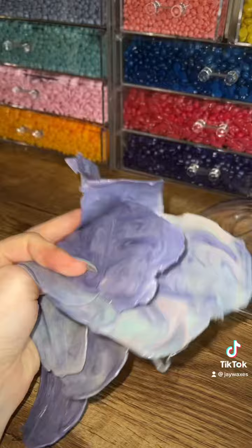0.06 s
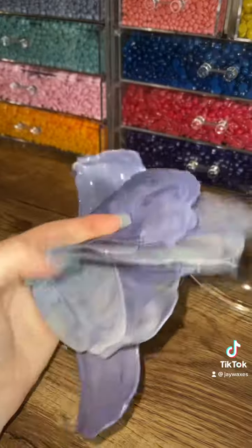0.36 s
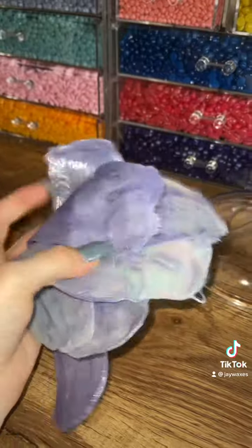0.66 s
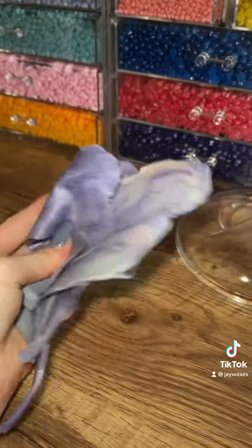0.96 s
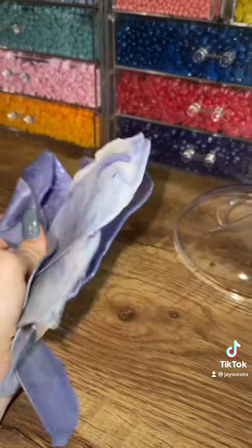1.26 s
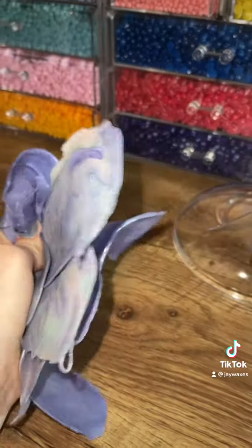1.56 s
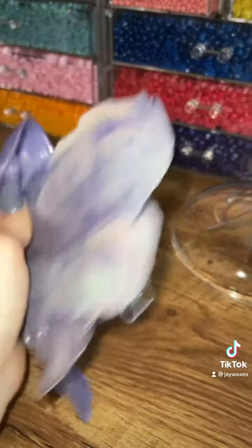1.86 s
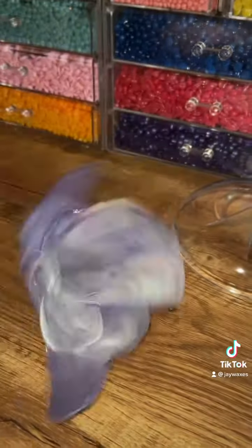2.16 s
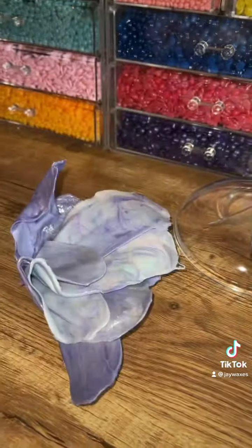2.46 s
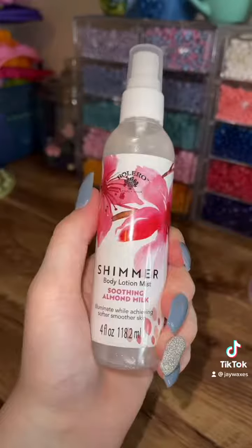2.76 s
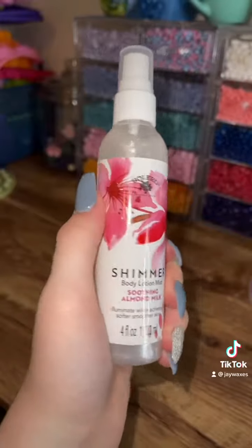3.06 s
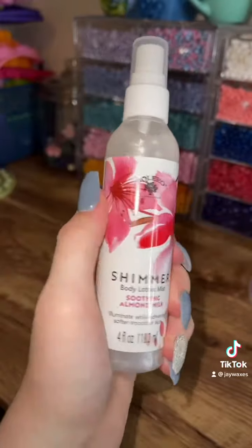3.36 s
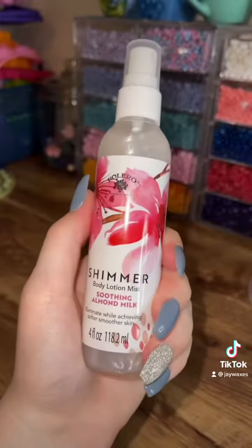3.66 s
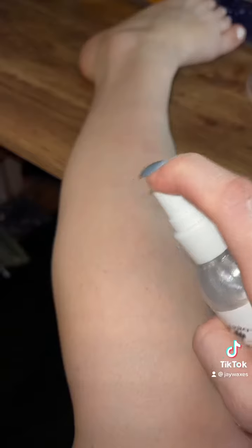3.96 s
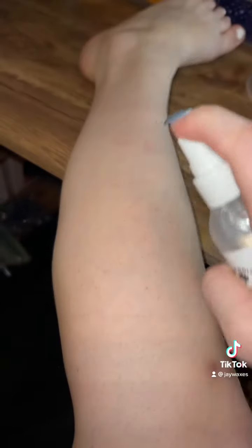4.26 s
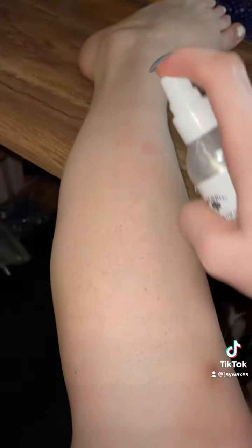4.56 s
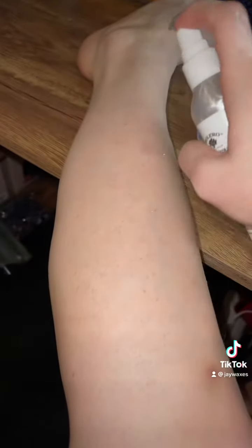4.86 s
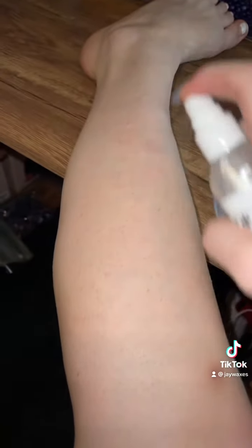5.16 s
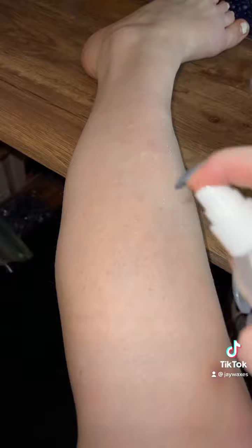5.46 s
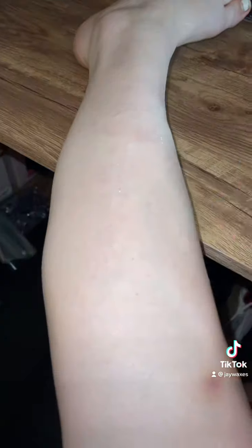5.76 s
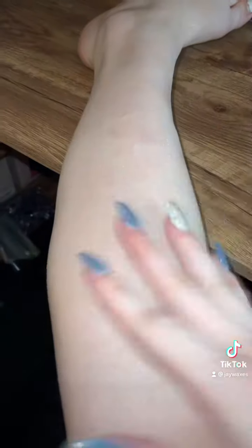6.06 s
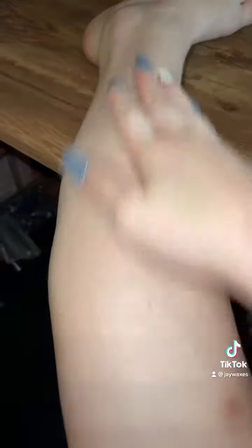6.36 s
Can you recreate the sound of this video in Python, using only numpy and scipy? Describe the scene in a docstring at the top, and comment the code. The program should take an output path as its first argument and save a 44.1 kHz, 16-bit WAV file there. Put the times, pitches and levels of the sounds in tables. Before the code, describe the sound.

From the start, hardened wax strips crackle and rustle in irregular bursts as a hand flexes them close to the microphone, with the sharpest snaps around 1.8 seconds. At about 2.1 seconds they slap down on a wooden table, which gives a low thump, the loudest sound. A brief silence at 2.6 seconds is followed by faint, dull handling bumps. From about 4 to 5.7 seconds a small mist bottle is pumped seven times, evenly and quickly, growing louder toward the end. Each stroke is a click and a short hiss, with a tiny gurgle and usually a light knock as the pump returns. After another very short silence, a palm makes one soft, brushing stroke over wet skin from about 6.1 to 6.6 seconds. A faint fan hums in the small room behind these sounds.

```python
"""Wax strips and a mist bottle

Hardened wax strips crackle as a hand flexes them, then drop on a wooden table, which booms.
A mist bottle is lifted and pumped seven times at a leg: valve snap, nozzle hiss, gurgle, piston knock.
A palm rubs the lotion in. Small room, humming fan, close microphone; two brief gaps of silence."""
import sys
import numpy as np
from scipy import signal
from scipy.fft import rfft, irfft
from scipy.io import wavfile
from scipy.ndimage import uniform_filter1d

SR = 44100
rng = np.random.default_rng(int(sys.argv[2]) if len(sys.argv) > 2 else 0)


def to_wav(s):
    """Save 16-bit WAV."""
    ch = np.atleast_2d(s).T  # columns
    pcm = np.round(np.clip(ch, -1, 1) * 32767)  # PCM
    wavfile.write(sys.argv[1], SR, pcm.astype(np.int16))


N = 291060
TIME = np.arange(N) / SR

# Audible spans. Each row: start and end in seconds, first and last fan gain in dB,
# last hiss level in dB, extra gain of the hushed opening in dB.
SPANS = [(0, 2.606, -4, -1, -93, -5), (2.78, 3.873, -12, -9, -81, -9.5), (3.84, 5.75, -10, 1, -99.5, -6.5),
         (5.87, 6.692, -1, 1, -77, 0)]
# Pump strokes. Each row: snap time in seconds, relative snap level in dB, snap pitch factor,
# mist start and length in seconds, mist level in dB.
STROKES = [(3.9683, -36.5, 0.97, 3.963, 0.092, -53.5), (4.2436, -38.5, 1.12, 4.288, 0.081, -49.5),
           (4.5297, -36.5, 1.07, 4.571, 0.089, -49), (4.814, -35.5, 0.97, 4.848, 0.098, -49.5),
           (5.0817, -34, 1.01, 5.124, 0.074, -45.5), (5.3407, -31.5, 0.94, 5.384, 0.059, -42),
           (5.5969, -27, 1.02, 5.624, 0.054, -43.5)]


def amp(db):
    """Decibels to gain."""
    return 10 ** (np.asarray(db) / 20)


def unit(x):
    """Scale to rms 1."""
    return x / np.sqrt(np.mean(x ** 2) + 1e-20)


def read(points, hz):
    """Interpolate (Hz, value) points on a log-frequency axis."""
    points_hz, values = np.transpose(points)
    return np.interp(np.log(hz + 1), np.log(points_hz + 1), values)


def add(mix, start_s, sound):
    """Mix a sound in, in place."""
    part = mix[max(round(start_s * SR), 0):][:len(sound)]
    part += sound[:len(part)]


def colour(x, spectrum):
    """Filter by (Hz, dB) points; rms 1."""
    gain = amp(read(spectrum, np.fft.rfftfreq(len(x), 1 / SR)))
    return unit(irfft(rfft(x) * gain, len(x)))


def drift(per_s):
    """Slow random wander; rms 1."""
    knots_s = np.arange(0, 7, 1 / per_s)
    return unit(np.interp(TIME, knots_s, rng.standard_normal(len(knots_s))))


def ring(hz, t60_s):
    """One decaying mode."""
    t = np.arange(SR // 2) / SR
    return 1000. ** (-t / t60_s) * np.sin(2 * np.pi * hz * t)


def click(shape_db, decay_s, chatter, size=4096):
    """A sharp release and a dying chatter of smaller slips; energy of 1 ms at rms 1."""
    t = np.arange(size) / SR
    after_slips = rng.standard_normal(size) * np.exp(-t / decay_s)
    drive = (t == 0) + chatter * after_slips / np.linalg.norm(after_slips)
    log_gain = np.log(amp(shape_db(abs(np.fft.fftfreq(size, 1 / SR)))))
    minimum_phase = np.exp(np.conj(signal.hilbert(log_gain)))
    sound = np.fft.ifft(np.fft.fft(drive) * minimum_phase).real
    return sound / np.linalg.norm(sound) * np.sqrt(SR / 1000)


def grains(per_s, spread_db):
    """Random train of tiny impulses, a few much larger than the rest."""
    sizes = amp(spread_db * np.minimum(rng.exponential(1, N), 3.5))
    return unit(sizes * rng.choice([-1, 1], N) * (rng.random(N) < per_s / SR))


def room(x, early_boost=0.93, early_s=0.024):
    """Close reflections off table and shelves run into a short tail that dies sooner in the treble."""
    # Room decay. Each row: frequency in Hz, t60 in seconds.
    decay = [(150, 0.55), (1000, 0.36), (4000, 0.34), (14000, 0.14)]
    t = np.arange(SR // 2) / SR
    echoes = rng.standard_normal(len(t)) * (rng.random(len(t)) < .15) * (t > .002)
    echoes *= 1 + early_boost * np.exp(-t / early_s)
    hz, frame_s, frames = signal.stft(echoes, SR, nperseg=256)
    fade = 1000. ** (-frame_s / read(decay, hz)[:, None])
    tail = signal.istft(frames * fade, SR, nperseg=256)[1]
    return signal.fftconvolve(x, tail / np.linalg.norm(tail))[:N]


def fan(rush_db=-59, waver_db=2.5, waver_turns=0.082):
    """A low rush of air and a wavering hum."""
    # Hum tones. Each row: frequency in Hz, relative level in dB.
    tones = [(58.5, -57), (168, -71), (274, -71), (312, -77.5)]
    # Air rush spectrum. Each row: frequency in Hz, relative density in dB.
    rush_spectrum = [(25, -0.5), (55, 3.5), (100, -1.5), (200, -4.5), (330, -6.5), (600, -11.5),
                     (1000, -20.5), (2500, -24), (5000, -32.5), (10000, -32), (12000, -38), (16000, -39)]
    hum = np.zeros(N)
    for hz, db in tones:
        peak = np.sqrt(2) * amp(db + waver_db * drift(8))
        hum += peak * np.sin(2 * np.pi * (hz * TIME + waver_turns * drift(6)))
    return hum + amp(rush_db) * colour(rng.standard_normal(N), rush_spectrum)


def background(opening_s=.14, fade_s=.012):
    """The fan under a thin high hiss; each span opens hushed and slowly grows louder."""
    # Hiss spectrum. Each row: frequency in Hz, relative density in dB.
    hiss_spectrum = [(3000, -13), (9000, -16), (12000, -11.5), (13500, 4.5), (15500, 2.5), (16000, -2.5)]
    fan_sound = fan()
    hiss = colour(rng.standard_normal(N), hiss_spectrum)
    out = np.zeros(N)
    for start_s, end_s, first_db, last_db, hiss_db, opening_db in SPANS:
        span = (TIME >= start_s) & (TIME < end_s)
        t = TIME[span] - start_s
        hushed = .5 - .5 * np.tanh((t - opening_s) / fade_s)
        swell = amp((first_db - last_db) * (1 - t / (end_s - start_s)) + opening_db * hushed)
        out[span] = swell * (amp(last_db) * fan_sound[span] + amp(hiss_db) * hiss[span])
    return out


def handling():
    """Dull swells as the fingers shift their grip."""
    # Soft hand bumps. Each row: start and length in seconds, level in dB, upper edge in Hz.
    bumps = [(0.16, 0.083, -52, 150), (0.84, .13, -57, 149), (1.143, .1, -55, 796), (1.25, .11, -54.5, 130),
             (2.923, 0.12, -55, 75.4), (2.931, 0.1, -65, 345.5), (3.017, .07, -58.5, 499),
             (3.066, .09, -61.5, 170), (3.421, 0.078, -65, 300), (3.49, 0.084, -58, 64.8)]
    out = np.zeros(N)
    for start_s, length_s, db, edge_hz in bumps:
        lowpass = signal.butter(2, edge_hz, fs=SR, output="sos")
        dull = signal.sosfilt(lowpass, rng.standard_normal(SR))[-int(length_s * SR):]
        add(out, start_s, amp(db) * unit(dull) * signal.windows.tukey(len(dull), .7))
    return out


def palm(uneven_db=1.5, stubble=0.44, touch_s=6.063, touch_db=-63):
    """A fingertip touches down, then one smooth stroke runs up the wet shin."""
    # Rub envelope. Each row: time in seconds, level in dB.
    rub = [(6.04, -85), (6.09, -66.5), (6.14, -57), (6.22, -57.5), (6.35, -56.5), (6.46, -59.5),
           (6.54, -66), (6.6, -80)]
    # Skin friction spectrum. Each row: frequency in Hz, relative density in dB.
    skin = [(400, -19), (700, -12), (900, -25), (1500, -9), (2200, -8.5), (2800, -0.5), (3600, -6.5),
            (5300, -8.5), (7700, -10.5), (8800, -7), (11300, -13.5), (15000, -9)]
    rub_s, rub_db = np.transpose(rub)
    envelope = np.interp(TIME, rub_s, amp(rub_db), left=0, right=0)
    friction = rng.standard_normal(N) + stubble * grains(per_s=2200, spread_db=4)
    out = envelope * amp(uneven_db * drift(40)) * colour(friction, skin)
    add(out, touch_s, amp(touch_db) * click(lambda hz: read(skin, hz), decay_s=.002, chatter=2))
    return out


def gulps(gain_db=-3, delay_s=.034, neck_hz=2010, width_octaves=.16, skirt_db=-17):
    """Air drawn back through the pump gurgles in the bottle's neck, louder after a stronger puff."""
    def shape_db(hz):
        octaves = np.log2((hz + 1) / neck_hz)
        return skirt_db * (1 - np.exp(-(octaves / width_octaves) ** 2)) - 8 * abs(octaves)
    out = np.zeros(N)
    for *_, start_s, length_s, db in STROKES:
        gurgle = click(shape_db, decay_s=.007, chatter=2.2)
        add(out, start_s + length_s + delay_s, amp(db + gain_db) * gurgle)
    return out


def pump(press_db=-5, return_db=-5, lag_s=.0008,
         bottle_db=-20, press_hz=1930, return_hz=2330, bottle_t60_s=.11):
    """The valve snaps going down, the piston knocks coming up; the bottle rings faintly after both."""
    # Piston springing back. Each row: time in seconds, relative level in dB, pitch factor.
    returns = [(4.153, -39.5, 1), (4.460, -41, 0.98), (4.746, -39.5, 0.69), (4.753, -39, 0.96),
               (5.032, -53.5, 0.76), (5.556, -36.5, 0.96), (5.731, -43, .95)]
    # Valve and piston spectra at pitch factor 1. Each row: frequency in Hz, gain in dB.
    valve = [(200, -15), (550, -3), (900, -13), (1400, -10.5), (1850, -1.5), (2200, -5.5), (3000, -2.5),
             (4300, -14), (7500, -14.5), (12000, -24.5), (15500, -21)]
    piston = [(300, -29), (800, -18.5), (1600, -7), (2050, -10), (2420, -1), (2800, -6), (3250, -0.5),
              (3900, -14.5), (5000, -30), (15000, -53.5)]
    out = np.zeros(N)
    for start_s, db, pitch, *_ in STROKES:
        snap = click(lambda hz: read(valve, hz / pitch), decay_s=.0028, chatter=2.8)
        bottle = amp(bottle_db) * ring(press_hz * pitch, bottle_t60_s)
        add(out, start_s + lag_s, amp(db + press_db) * snap)
        add(out, start_s + lag_s, amp(db + press_db) * bottle)
    for start_s, db, pitch in returns:
        knock = click(lambda hz: read(piston, hz / pitch), decay_s=.0016, chatter=1)
        bottle = amp(bottle_db) * ring(return_hz * np.sqrt(pitch), bottle_t60_s)
        add(out, start_s + lag_s, amp(db + return_db) * knock)
        add(out, start_s + lag_s, amp(db) * bottle)
    return out


def mist(arch_db=6, rise_s=0.0043, fall_s=0.018, droplets=0.57):
    """The nozzle hisses while the pressure swells and sinks; droplets roughen the jet."""
    # Jet spectrum. Each row: frequency in Hz, relative density in dB.
    jet_spectrum = [(250, -19), (550, -8), (850, -10.5), (1300, -2.5), (1900, -0.5), (2750, 2),
                    (3900, -2.5), (6000, -6), (7300, -9.5), (9200, -4), (11300, -13), (14000, -6.5),
                    (16000, -8)]
    flow = np.zeros(N)
    for *_, start_s, length_s, db in STROKES:
        t = np.maximum(TIME - start_s, 0)
        pressure_db = arch_db * (np.sin(np.pi * np.minimum(t / length_s, 1)) - 1)
        gate = (1 - np.exp(-t / rise_s)) * np.exp(-np.maximum(t - length_s, 0) / fall_s)
        flow += amp(db + pressure_db) * gate
    jet = rng.standard_normal(N) + droplets * grains(per_s=2500, spread_db=2)
    return flow * colour(jet, jet_spectrum)


def table_top(contact_s=0.0094):
    """The soft weight of the wax settles over several milliseconds and booms the board."""
    # Board modes. Each row: frequency in Hz, relative level in dB, t60 in seconds.
    modes = [(79.3, -12, .25), (109.1, -0.5, .115), (122.4, -3, .13), (141, -13, .18), (170, -19, 0.27),
             (212, -17.5, .2), (272, -20.5, .17), (364.6, -21.5, .12), (460.5, -23.5, .09)]
    # Blows on the board. Each row: start in seconds, gain in dB.
    thumps = [(0.171, -44), (2.106, -29), (2.136, -31), (2.180, -9), (2.241, -27), (2.299, -31.5)]
    t = np.arange(SR // 2) / SR
    onset = 1 - np.exp(-(t / contact_s) ** 2)
    boom = onset * sum(amp(db) * ring(hz, t60_s) for hz, db, t60_s in modes)
    out = np.zeros(N)
    for start_s, db in thumps:
        add(out, start_s, amp(db) * boom)
    return out


def clatter(slap_db=-3, radiation_hz=950):
    """Strips slap flat on each other or on the wood, and ring hollow when knocked."""
    # Slaps. Each row: start in seconds, relative level in dB, decay in seconds.
    slaps = [(0.1712, -28.5, 0.0011), (2.089, -33.5, 0.0076), (2.102, -15.5, 0.01), (2.1325, -17, 0.0098),
             (2.175, -20.5, 0.0058), (2.290, -37.5, 0.0069)]
    # Slap spectrum. Each row: frequency in Hz, gain in dB.
    slap_spectrum = [(30, -19), (100, -0.5), (300, -0.5), (550, -4), (1100, -1), (1900, -0.5), (3000, -13),
                     (6000, -20.5), (15000, -31)]
    # Knocks. Each row: start in seconds, gain in dB, lowest mode in Hz, its t60 in seconds.
    knocks = [(1.8389, -29.5, 1614, .024), (1.840, -36, 1843, .18), (2.028, -42.5, 1090, .09),
              (2.3275, -47, 3600, 0.037)]
    # Bending modes of a strip. Each row: frequency ratio, relative level in dB.
    modes = [(1, -0.5), (1.09, -7.5), (1.48, -14.5), (1.9, -10), (2.7, -10)]
    out = np.zeros(N)
    for start_s, db, decay_s in slaps:
        slap = click(lambda hz: read(slap_spectrum, hz), decay_s, chatter=3.3)
        add(out, start_s, amp(db + slap_db) * slap)
    highpass = signal.butter(2, radiation_hz, "high", fs=SR, output="sos")  # too small to radiate bass
    for start_s, db, hz, t60_s in knocks:
        strip = sum(amp(db + mode_db) * ring(hz * ratio, t60_s / ratio) for ratio, mode_db in modes)
        add(out, start_s, signal.sosfilt(highpass, strip))
    return out


def flexing(lead_db=-14.5, lead_s=.014, attack_s=.0063, release_s=.025, settle_db=-11.5, settle_s=.088):
    """Surface and body envelopes of the wax: each flex leads in, builds, holds, lets go and settles."""
    # Flexes. Each row: start and hold in seconds, surface level in dB, body level relative to it in dB.
    flexes = [(0.0, 0.0086, -61, -4.5), (0.098, 0.022, -55.5, -14), (0.152, 0.059, -49.5, -5.5),
              (0.277, 0.019, -56, -7), (0.492, 0.024, -47.5, -4.5), (0.633, 0.019, -54.5, -7),
              (0.8, 0.19, -56, -3.5), (0.835, 0.04, -44.5, -9), (1.046, 0.078, -45, -11.5),
              (1.148, .06, -50, -8), (1.237, 0.13, -52.5, -8.5), (1.415, 0.11, -64.5, -7),
              (1.693, 0.044, -65.5, -8.5), (1.741, .04, -45, -8), (1.792, 0.079, -42, -3),
              (1.884, 0.099, -47.5, -1), (2.086, 0.098, -45, 2), (2.474, .04, -73, -10)]
    surface_power, body_power = np.zeros(N), np.zeros(N)
    for start_s, hold_s, db, body_db in flexes:
        before_s = np.maximum(start_s - TIME, 0)
        since_s = np.maximum(TIME - start_s, 0)
        after_s = np.maximum(since_s - hold_s, 0)
        attack = np.exp(-before_s / lead_s) * (1 - (1 - amp(lead_db)) * np.exp(-since_s / attack_s))
        settling = amp(settle_db) * np.exp(-after_s / settle_s)
        release = (np.exp(-after_s / release_s) + settling) / (1 + amp(settle_db))
        power = (amp(db) * attack * release) ** 2
        surface_power += power
        body_power += power * amp(body_db) ** 2
    return np.sqrt(surface_power), np.sqrt(body_power)


def slips(hiss=.45, clump_db=2.5):
    """Rough faces catch and slip in clumps of grains over a fine hiss."""
    friction = grains(per_s=650, spread_db=4.5) + hiss * rng.standard_normal(N)
    return friction * amp(clump_db * drift(180))


def rustle(flex, bend, fizz_db=-3, sparkle_db=-6, body_db=-3):
    """Strips slide over each other: one stream of slips gives fizz and body, another a brighter sparkle."""
    # Spectra of sliding wax. Each row: frequency in Hz, relative density in dB.
    fizz = [(1500, -24), (3300, -0.5), (5500, -0.5), (7500, -3.5), (9600, 0), (11500, -12), (16000, -18.5)]
    sparkle = [(3000, -24), (6000, -6.5), (9300, 1), (11500, -5.5), (14000, 1.5), (16000, -3)]
    body = [(200, -18), (700, -17), (1100, -3.5), (1900, 2), (2800, -6.5), (4500, -25), (9000, -37.5)]
    low_slips, high_slips = slips(), slips()
    surface = amp(fizz_db) * colour(low_slips, fizz) + amp(sparkle_db) * colour(high_slips, sparkle)
    return flex * surface + amp(body_db) * bend * colour(low_slips, body)


def small_cracks(flex, count=200, per_s=26, until_s=2.6, usual_db=-36.5, spread_db=1,
                 usual_flex_db=-47.5, db_per_flex_db=.83, flake_hz=6000, spread_octaves=.7):
    """Rows for fine chance cracks, louder the harder the wax is flexed."""
    start_s = (np.arange(count) + rng.random(count)) / per_s
    strength, pitch = np.clip(rng.standard_normal((count, 2)), -2, 2).T
    flex_db = 20 * np.log10(np.interp(start_s, TIME, flex) + 1e-9)
    db = usual_db + db_per_flex_db * (flex_db - usual_flex_db) + spread_db * strength
    ring_hz = flake_hz * 2 ** (spread_octaves * pitch)
    return [row for row in zip(start_s, db, ring_hz) if row[0] < until_s]


def cracks(flex, usual_hz=7000, ring_db=6, ring_db_per_octave=2, width_octaves=.27,
           body_hz=3100, body_db=-1.5, body_db_per_octave=4.5):
    """Each crack rings a wax flake; a larger, lower flake rings clearer and bends the strip more."""
    # Loudest cracks. Each row: start in seconds, level in dB, flake ring in Hz.
    loud_cracks = [(0.1071, -42, 9000), (0.156, -35.5, 8000), (0.163, -38.5, 2167), (0.1704, -21, 8250),
                   (0.3055, -41.5, 7800), (0.3649, -44.5, 1150), (0.4954, -36.5, 4350),
                   (0.5057, -31.5, 9430), (0.5244, -40, 1250), (0.642, -36, 1500), (0.6958, -42.5, 1940),
                   (0.7671, -46, 1980), (0.7937, -42.5, 7000), (0.8112, -39, 1890), (0.8323, -34, 3300),
                   (0.8825, -35, 5990), (0.943, -35.5, 6160), (1.0548, -34, 2330), (1.0913, -27, 4310),
                   (1.112, -28.5, 13000), (1.2069, -35, 5680), (1.288, -38.5, 9130), (1.3305, -34.5, 2710),
                   (1.4202, -37, 5340), (1.4683, -31.5, 3560), (1.5171, -35.5, 8800), (1.5737, -45.5, 5340),
                   (1.6528, -43, 3200), (1.6932, -47, 4480), (1.7991, -28.5, 3880), (1.8139, -29.5, 6730),
                   (1.8382, -20.5, 1750), (1.8483, -20, 7150), (1.8562, -24.5, 10470), (1.8906, -28, 3396),
                   (2.0838, -32.5, 7360), (2.1504, -23, 8530), (2.259, -41.5, 9400), (2.3275, -33.5, 3570),
                   (2.476, -43.5, 4850), (2.504, -44.5, 4160)]
    # Base crack spectrum. Each row: frequency in Hz, gain in dB.
    spectrum = [(200, -24.5), (700, -20), (1200, -9), (2000, -4), (4000, 0), (5500, -2.5), (9000, 1),
                (11500, -8), (14000, -6.5), (16000, -9)]
    out = np.zeros(N)
    for start_s, db, ring_hz in list(loud_cracks) + small_cracks(flex):
        def shape_db(hz):
            octaves_down = np.log2(usual_hz / ring_hz)
            resonance = np.exp(-(np.log2((hz + 1) / ring_hz) / width_octaves) ** 2)
            flake_db = (ring_db + ring_db_per_octave * octaves_down) * resonance
            strip_db = (body_db + body_db_per_octave * octaves_down) / (1 + (hz / body_hz) ** 4)
            return read(spectrum, hz) + flake_db + strip_db
        add(out, start_s, amp(db) * click(shape_db, decay_s=.00095, chatter=1.3))
    return out


def scene(wax_room_db=-10, slap_room_db=-13, pump_room_db=-8, lotion_room_db=-8):
    """All sources in mono, the bright ones with their share of the room."""
    flex, bend = flexing()
    wax = cracks(flex) + rustle(flex, bend)
    slaps = clatter()
    bottle = pump() + gulps()
    lotion = mist() + palm()
    reverb = room(amp(wax_room_db) * wax + amp(slap_room_db) * slaps
                  + amp(pump_room_db) * bottle + amp(lotion_room_db) * lotion)
    return (wax + slaps + bottle + lotion + reverb + table_top() + handling() + background())[None]


def record(dry, low_cut_hz=42, edge_hz=16100):
    """Microphone low cut, silence outside the spans, then the band limit."""
    highpass = signal.butter(3, low_cut_hz, "high", fs=SR, output="sos")
    lowpass = signal.firwin(401, edge_hz, window=("kaiser", 9), fs=SR)
    gate = np.zeros(N)
    for start_s, end_s, *_ in SPANS:
        gate[(TIME >= start_s) & (TIME < end_s)] = 1
    gated = signal.sosfilt(highpass, dry) * uniform_filter1d(gate, size=64)
    return signal.oaconvolve(gated, lowpass[None], "same")


dry = scene()
out = record(dry)
to_wav(out)
```